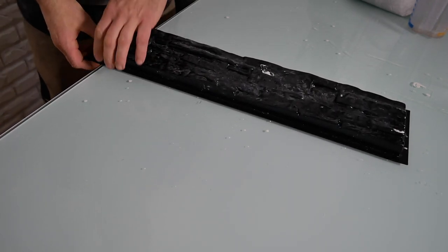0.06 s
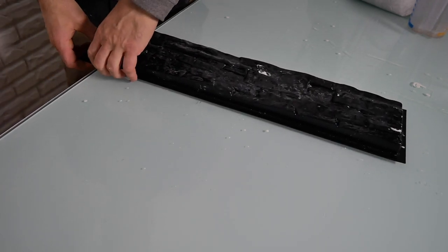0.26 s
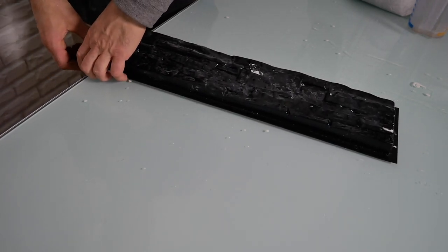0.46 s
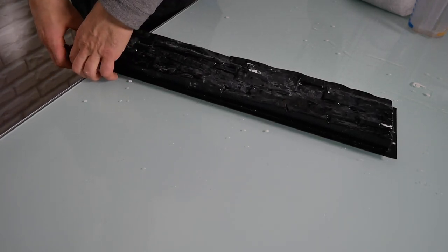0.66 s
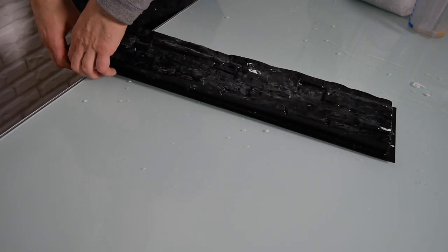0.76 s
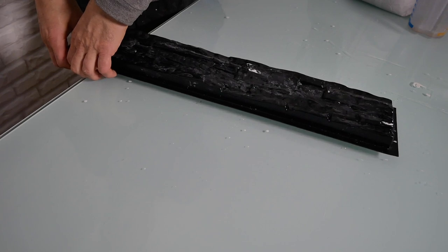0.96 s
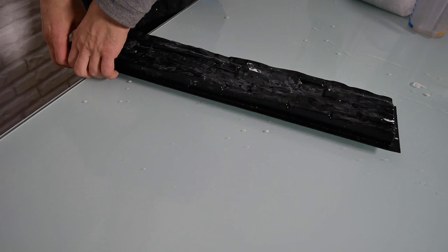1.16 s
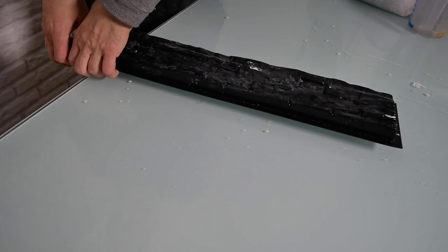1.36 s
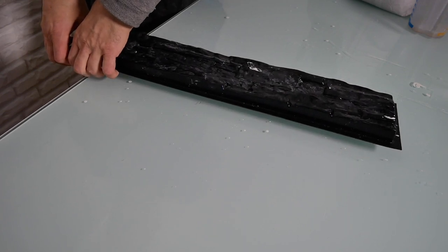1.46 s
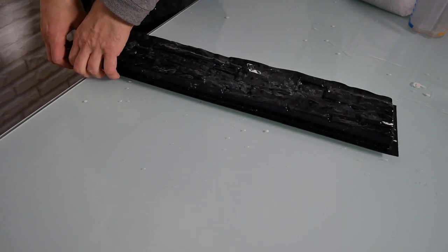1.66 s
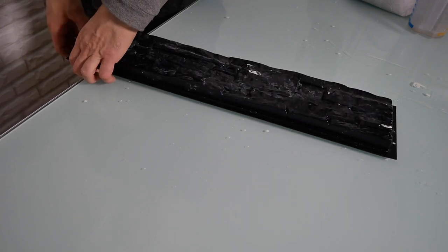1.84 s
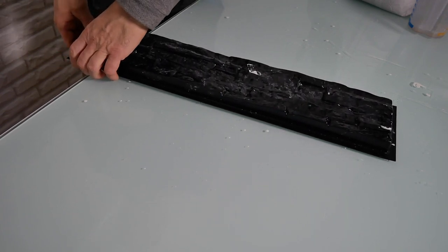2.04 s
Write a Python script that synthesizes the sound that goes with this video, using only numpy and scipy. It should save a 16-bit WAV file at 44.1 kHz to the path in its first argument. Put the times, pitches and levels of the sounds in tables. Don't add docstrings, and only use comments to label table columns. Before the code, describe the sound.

Rubber mould handled on a glass tabletop: skin rubbing, one firm slap, juddering shoves, light knocks

```python
import sys
import numpy as np
from scipy import signal
from scipy.fft import rfft, irfft, next_fast_len
from scipy.io import wavfile
from scipy.ndimage import uniform_filter1d, map_coordinates

SR = 44100
rng = np.random.default_rng(int(sys.argv[2]) if len(sys.argv) > 2 else 0)


def decibels_to_gain(level_db):
    exponent = np.asarray(level_db, float) / 20
    return 10 ** exponent


def put_to_file(sound):
    columns = np.atleast_2d(sound).T
    safe = np.clip(columns, -1, 1)
    whole_steps = np.round(safe * 32767)
    wavfile.write(sys.argv[1], SR, whole_steps.astype(np.int16))


N = 92610
TIME_S = np.arange(N) / SR
LIGHT_FROM_S = 1


def unit(x):
    return x / np.sqrt(np.mean(x ** 2) + 1e-20)


def along(points, hz):
    f, v = np.transpose(points)
    return np.interp(np.log(hz + 1), np.log(f + 1), v)


def curves(rows, fade_s=0.011):
    s, *columns = np.transpose(rows)
    s = np.r_[s[0] - fade_s, s, s[-1] + fade_s]
    return [np.interp(TIME_S, s, np.r_[-120, c, -120]) for c in columns]


def wobble(rate_hz):
    knots = rng.standard_normal(int(N * rate_hz / SR) + 4)
    return map_coordinates(knots, [np.arange(N) * rate_hz / SR])


def filtered(x, response):
    m = next_fast_len(N + SR // 2)
    return irfft(rfft(x, m) * response(np.fft.rfftfreq(m, 1 / SR)), m)[..., :N]


def friction(spectrum, grain_db, grain_hz, patchy_db, patch_frames=5):
    slips = rng.standard_normal(N) * decibels_to_gain(grain_db * wobble(grain_hz))
    z = signal.stft(slips, nperseg=512)[2]
    field = uniform_filter1d(rng.standard_normal(z.shape), 4, 0)
    field = uniform_filter1d(field, patch_frames, 1)
    noise = signal.istft(z * decibels_to_gain(patchy_db * unit(field)), nperseg=512)[1][:N]
    return unit(filtered(noise, lambda hz: decibels_to_gain(along(spectrum, hz))))


def fingertips():
    # start_s, level_db
    strokes = [
        [(0.0, -51.5), (0.016, -44.5), (0.24, -46.5)],
        [(1.95, -85.5), (1.986, -52), (2.1, -43.5)],
    ]
    # start_s, level_db
    resting = [
        (.98, -72.5),
        (1.15, -62.5),
        (1.4, -65),
        (1.6, -64),
        (1.75, -58),
    ]
    skin = [(100, -43.5), (600, -28), (2000, -19.5), (4050, -15), (4300, 3.5), (5800, 0), (6300, -9.5),
            (14000, -28.5), (15500, -41.5)]
    skin_edge = [(100, -45.5), (580, -10), (1200, -36), (3200, -20.5), (5600, 1), (6500, -10.5),
                 (8000, -21), (15500, -31.5)]
    grip = [(1200, -18.5), (2500, 1), (3700, -5), (4600, 3.5), (6200, -9), (7000, -14.5), (13500, -15),
            (15500, -20)]
    first, last, middle = [decibels_to_gain(curves(rows, fade_s=.03)[0] + 0.47 * wobble(40.17))
                           for rows in strokes + [resting]]
    out = middle * friction(grip, 3.2, 60.1, patchy_db=6.5, patch_frames=12)
    out += first * friction(skin, 0.74, 510, patchy_db=-4.0, patch_frames=12)
    return out + last * friction(skin_edge, 2.5, 230, patchy_db=-3.0, patch_frames=12)


def heel():
    # start_s, level_db
    brush = [
        [(0, -70), (.035, -49), (.08, -51.5), (.11, -60), (.16, -56), (.21, -56)],
        [(1.93, -86), (2.01, -76.5), (2.06, -76.5), (2.1, -65)],
    ]
    # hz, level_db
    heel_bands = [(70, -33), (150, -6), (300, -14.5), (600, -5.5), (1000, -3), (1500, -3), (2400, 1),
                  (4000, 1.5), (5000, -33.5)]
    level = sum(decibels_to_gain(curves(rows)[0]) for rows in brush)
    return level * friction(heel_bands, 2.5, 110, patchy_db=2, patch_frames=12)


def palm():
    # start_s, level_db
    swipes = [
        [(.195, -56.5), (.225, -35), (.29, -36), (.36, -29), (.41, -35), (.455, -45.5)],
        [(1.72, -60.5), (1.76, -49.5), (1.785, -39.5), (1.818, -31.5), (1.85, -50), (1.9, -68)],
    ]
    # hz, level_db
    palm_bands = [(71, -62.5), (120, -22), (733, 2), (1020, -6.5), (1300, 0.5), (2490, -0.5), (5060, -0.5),
                  (11200, -17), (15500, -29.5)]
    rim_cut_hz = 310
    flat, rim = [decibels_to_gain(curves(rows, fade_s=0.014)[0]) for rows in swipes]
    rub = friction(palm_bands, 0.43, 400, patchy_db=2.5)
    edge = filtered(rub * decibels_to_gain(2.7 * wobble(300)), lambda f: (1j * f / (rim_cut_hz + 1j * f)) ** 4)
    return flat * rub + rim * edge


def sleeve():
    # centre_s, half_length_s, level_db
    rustles = [
        (0.655, 0.04, -60.5),
        (0.66, 0.01, -74),
        (0.834, 0.014, -51),
        (1.07, 0.0087, -62.5),
        (1.101, .025, -57),
        (1.51, 0.026, -62.5),
    ]
    # hz, level_db
    cloth = [(2940, -37), (5000, -1), (7550, -5.5), (8910, -5.5), (9890, -3.5), (15500, -28.5)]
    level = sum(decibels_to_gain(db) * np.exp(-((TIME_S - s) / half_s) ** 2) for s, half_s, db in rustles)
    return level * friction(cloth, 7.0, 200, patchy_db=7.5)


def rubbing():
    return fingertips() + heel() + palm() + sleeve()


def ticks():
    # start_s, level_db, pitch_hz, t60_s
    snaps = [(0.46, -18, 4080, 0.0076), (0.44, -13.5, 1740, 0.018), (.8185, -41, 12600, 0.0054),
             (0.49, -24.5, 6160, 0.0083), (0.68, -36.5, 5300, 0.02), (0.63, -43, 2970, 0.021),
             (0.82, -14, 9700, 0.0015), (0.938, -37, 6760, 0.0015), (0.98, -30.5, 4830, 0.016),
             (1.252, -27, 1440, 0.012), (0.42, -28, 4200, 0.0064), (1.79, -34, 930, 0.034),
             (2.013, -54, 710, .1), (1.403, -33.5, 188, 0.079), (1.42, -36.5, 201, 0.24),
             (1.59, -35.5, 188, 0.1), (1.46, -39.5, 200, 0.14), (1.81, -50, 130, 0.067),
             (0.14, -63, 160, 0.15), (0.2, -46, 132, 0.093), (2.03, -66.5, 150, 0.17),
             (1.495, -35.5, 3900, 0.023), (1.402, -19.5, 1200, 0.013), (1.401, -35.5, 1870, 0.022),
             (1.469, -54, 5100, 0.024), (1.492, -30.5, 3850, 0.0075), (1.493, -26, 1650, 0.0071),
             (1.4, -46, 5320, 0.074), (1.556, -22.5, 1500, 0.016), (1.608, -19.5, 1330, 0.011),
             (1.607, -25, 2310, 0.0083), (1.721, -40, 4800, 0.037), (1.73, -46, 2220, 0.4),
             (1.812, -28, 1470, 0.025)]
    out, t = np.zeros(N + SR), np.arange(SR // 10) / SR
    rise = np.sin(np.pi / 2 * np.minimum(t / 0.00082, 1)) ** 2
    for s, db, hz, t60_s in snaps:
        waver = np.sin(2 * np.pi * (rng.random() + rng.uniform(55, 200) * t))
        phase = 2 * np.pi * hz * t + 1.1 * waver
        out[round(s * SR):][:len(t)] += decibels_to_gain(db - 60 * t / t60_s) * rise * np.sin(phase)
    return out[:N]


def glass(force):
    # mode_hz, level_db, t60_s
    modes = [(153, -23, 0.25), (279, -9.5, 0.41), (331.6, -8, 0.46), (405.5, -13, 0.43), (483.6, -21, 0.38),
             (538, -10, 0.15), (579, -11, 0.32), (698, -18.5, 0.18), (803, -27, .2), (840, -26, 0.1),
             (966.5, -14, .2), (1166, -24, .25), (1290, -23.5, .3), (1447, -18, .3)]
    damped_t60_s = .4
    t = np.arange(SR // 2) / SR
    ring = sum(decibels_to_gain(db - 60 * t / min(t60_s, damped_t60_s)) * np.sin(2 * np.pi * hz * t)
               for hz, db, t60_s in modes)
    return signal.fftconvolve(force, ring)[:N]


def slap():
    # hz, level_db
    slap_bands = [(300, -7), (800, 0), (1400, -4.5), (2800, -13.5), (3750, -16), (4200, -24.5), (7000, -37),
                  (12000, -70.5)]
    start_s, level_db, t60_s = .4562, -16, 0.026
    flap_db, flap_t60_s = -12.5, 0.31
    u = np.maximum(TIME_S - start_s, 0)
    decay = decibels_to_gain(-60 * u / t60_s) + decibels_to_gain(flap_db - 60 * u / flap_t60_s)
    rise = np.minimum(u / 0.0019, 1)
    return decibels_to_gain(level_db) * decay * rise * friction(slap_bands, 4.3, 500, patchy_db=0.0)


def knocks():
    # start_s, peak_db, pad_pitch_hz
    contacts = [(0.226, -38, 279), (0.455, -5, 538), (.496, -17.5, 500), (.509, -19.5, 560),
                (.662, -41, 900), (0.681, -13.5, 570), (.686, -15.5, 640), (0.702, -32.5, 452),
                (.721, -31, 596), (0.817, -16.5, 570), (.840, -16.5, 550), (0.856, -38, 680),
                (.965, -21, 835), (0.976, -15, 980), (.997, -24, 580), (1.073, -23, 618),
                (1.197, -25.5, 740), (1.211, -31.5, 540), (1.253, -25, 840), (1.357, -26, 695),
                (1.401, -15, 656), (1.468, -19, 800), (1.49, -10.5, 840), (1.521, -22.5, 690),
                (1.557, -17, 740), (1.585, -25, 641), (1.604, -15.5, 747), (1.643, -29.5, 630),
                (1.686, -43.5, 610), (1.7, -26.5, 582), (1.716, -24, 713.7), (1.752, -22.5, 737),
                (2.089, -46, 610)]
    pad_cycles, light_cycles = 1.485, 1.81
    rise_s, lag_s, glass_db = 0.0018, 0.00158, -26.5
    out, t = np.zeros(N + SR), np.arange(SR // 20) / SR
    rise = np.sin(np.pi / 2 * np.minimum(t / rise_s, 1)) ** 2
    for s, db, hz in contacts:
        cycles = pad_cycles if s < LIGHT_FROM_S else light_cycles
        pad = np.exp(-t * hz / cycles * 2) * np.cos(2 * np.pi * hz * (t - rise_s))
        out[round((s + lag_s) * SR):][:len(t)] += decibels_to_gain(db + 7.5) * rise * pad
    pads = out[:N]
    return pads + slap() + decibels_to_gain(glass_db) * glass(pads) / 10


def thumps():
    # start_s, shake_db, boom_db
    pushes = [
        (0.239, -70, -56),
        (0.471, -74, -34.5),
        (0.821, -65, -31.5),
        (0.938, -61, -36),
        (1.41, -78.5, -58.5),
        (1.756, -72, -75),
    ]
    shake_hz, shake_s = 43, 0.015
    boom_hz, boom_t60_s, boom_rise_s = 116.3, 0.43, 0.06
    out = np.zeros(N)
    for s, shake_db, boom_db in pushes:
        v = TIME_S - s
        u = np.maximum(v, 0)
        out += decibels_to_gain(shake_db) * np.exp(-(v / shake_s) ** 2) * np.sin(2 * np.pi * shake_hz * v)
        swell = decibels_to_gain(boom_db - 60 * u / boom_t60_s) * (1 - np.exp(-u / boom_rise_s))
        out += swell * np.sin(2 * np.pi * boom_hz * u)
    return out


def dust():
    # start_s, level_db, t60_s
    sprays = [
        (0.674, -51.5, 0.13),
        (.805, -55.5, 0.11),
        (0.816, -58.5, 0.075),
        (0.934, -50, 0.15),
        (0.953, -44.5, 0.16),
        (1.312, -60, 0.13),
    ]
    # hz, level_db
    dust_bands = [(2000, -26), (3500, 0.5), (5300, 5), (7000, -6), (11000, -26.5), (15500, -40.5)]
    level = sum((TIME_S > s) * decibels_to_gain(db - 60 * abs(TIME_S - s) / t60_s) for s, db, t60_s in sprays)
    return level * friction(dust_bands, 2.5, 500, patchy_db=2)


def dragging():
    # start_s, drag_db, grit_over_drag_db
    shoves = [
        [(.664, -32, -26), (.679, -34, -10), (.686, -27, -9), (.73, -30, -36), (.8, -36, -48)],
        [(.806, -33, -14), (.821, -25, -9), (.845, -27.5, -9.5), (.88, -33.5, -13.5), (.93, -32.5, -27)],
        [(.937, -32, -7.5), (.965, -25.5, -9), (1.03, -32, -14), (1.077, -31.5, -15), (1.12, -38, -25),
         (1.18, -65, 4)],
    ]
    drag_bands = [(53, -41.5), (90, -17), (315, -3), (899, -2.5), (1340, -7), (1780, -21.5), (3360, -61.5),
                  (4000, -43), (5200, -74.5), (8800, -120)]
    grit_bands = [(880, 2), (1500, 1.5), (2860, -3), (3750, -9), (4000, -13), (6000, -46), (15500, -90.5)]
    # ridge_hz, width_hz, level_db
    ribs = [(1967, 89, 5.5), (2210, 40, 4), (2460, 58, 2.5), (2820, 60, -8), (3380, 36, 9.5)]
    glass_db = -9
    drag = sum(decibels_to_gain(curves(rows)[0]) for rows in shoves)
    grit = sum(decibels_to_gain(sum(curves(rows, fade_s=0.0033))) for rows in shoves)
    judder = drag * friction(drag_bands, 0.37, 250, patchy_db=0.9)
    ring = glass(judder)
    ring = ring * np.std(judder) / np.std(ring)

    def ridges(f):
        return 1 + sum(decibels_to_gain(db) * 1j * f * w / (c * c - f * f + 1j * f * w) for c, w, db in ribs)

    hiss = grit * filtered(friction(grit_bands, 2.3, 600, patchy_db=2.0), ridges)
    return decibels_to_gain(-5.5) * (judder + decibels_to_gain(glass_db) * ring) + decibels_to_gain(-3.5) * hiss + dust()


def room(x):
    # hz, t60_s
    decay = [(100, 0.55), (250, 0.46), (500, 0.29), (2000, 0.23), (6000, 0.18), (14000, 0.2)]
    early_db, early_t60_s, delay = 8.5, 0.012, 130
    out, step = np.zeros(N + 2 * SR), SR // 10
    padded = np.pad(x, (step, 2 * step))
    window = signal.get_window('hann', 2 * step)
    for start in range(0, N + step, step):
        piece = padded[start:start + 2 * step] * window
        hz, t, z = signal.stft(rng.standard_normal(SR // 2), SR, nperseg=256)
        late = decibels_to_gain(-60 * t / along(decay, hz)[:, None])
        early = decibels_to_gain(early_db - 60 * t / early_t60_s)
        tail = signal.istft(z * (late + early), SR, nperseg=256)[1]
        answer = signal.fftconvolve(piece, tail / np.sqrt(np.sum(tail ** 2)))
        out[start + delay:][:len(answer)] += answer
    return out[step:step + N]


def hush():
    # hz, level_db
    air = [(35, -39), (60, -15.5), (4220, -6), (6260, 0.5), (7540, -6.5), (15500, -6)]
    level_db = -76.5
    return decibels_to_gain(level_db + 1.5) * friction(air, 1.2, 24.7, patchy_db=1.5, patch_frames=12)


def scene():
    low_cut_hz = 90.4
    wet_db, light_wet_db, tick_wet_db, rub_wet_db = 2, -1.5, -3, -11.5
    hands, snaps = rubbing(), ticks()
    table = knocks() + dragging()
    table_wet = decibels_to_gain(np.where(TIME_S < LIGHT_FROM_S, wet_db, light_wet_db))
    send = table_wet * table + decibels_to_gain(tick_wet_db) * snaps + decibels_to_gain(rub_wet_db) * hands
    mid = table + hands + snaps + room(send) + hush()
    mid = filtered(mid, lambda f: (1j * f / low_cut_hz / (1 + 1j * f / low_cut_hz)) ** 4) + thumps()
    return np.array([mid, mid])


def roll_off(x):
    return signal.sosfilt(signal.butter(12, 15700, fs=SR, output="sos"), x)


def record(dry):
    # hz, noise_estimate_db per bin
    gate = [(100, -86.5), (2000, -99), (15000, -102)]
    # hz, side_under_mid_db
    side_by_hz = [(100, -20), (700, -20), (2500, -19), (5000, -23.5), (14000, -15)]
    gate_floor_db, top_hz = -19, 15650
    block_hz, block_s, block_share, quiet_side_db = 500, .035, .3, -27.5
    hz, t, z = signal.stft(dry[0], SR, nperseg=512)
    power = uniform_filter1d(uniform_filter1d(abs(z) ** 2, 3, 0), 3, 1)
    noise_power = decibels_to_gain(2 * along(gate, hz))[:, None]
    z = z * np.maximum(1 - noise_power / (abs(power) + 1e-20), decibels_to_gain(gate_floor_db))
    blocks = np.ix_((hz / block_hz).astype(int), (t / block_s).astype(int))
    quiet = rng.random((60, 200))[blocks] > block_share
    side = decibels_to_gain(along(side_by_hz, hz)[:, None] + quiet_side_db * quiet)
    side = side * np.exp(2j * np.pi * rng.random(z.shape))
    both = signal.istft(np.array([z * (1 + side), z * (1 - side)]), SR, nperseg=512)[1][:, :N]
    both = filtered(both, lambda f: f < top_hz)
    return roll_off(both)


dry = scene()
out = record(dry)
put_to_file(out)
```